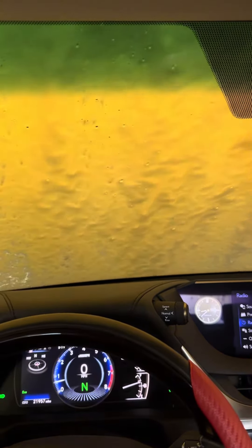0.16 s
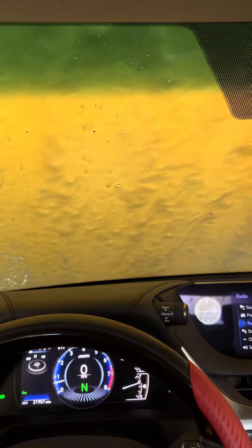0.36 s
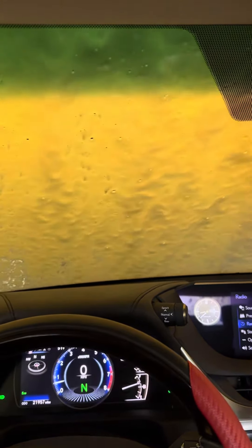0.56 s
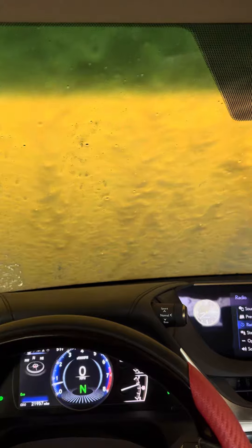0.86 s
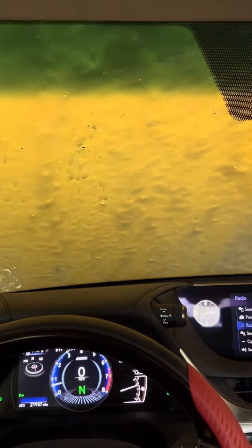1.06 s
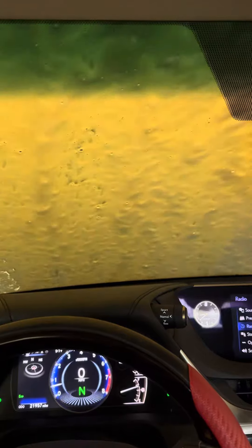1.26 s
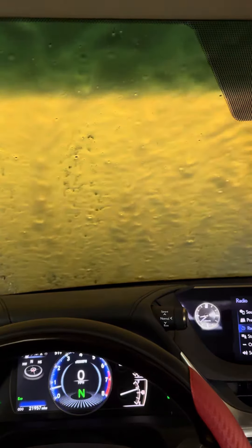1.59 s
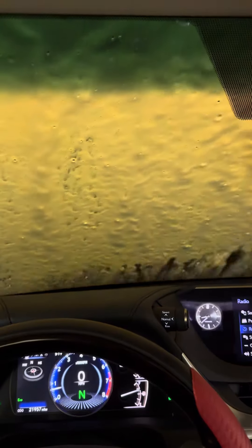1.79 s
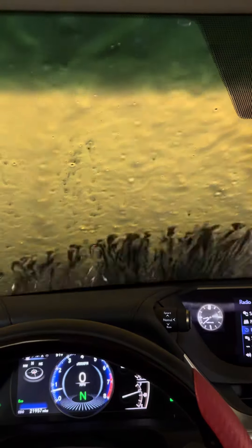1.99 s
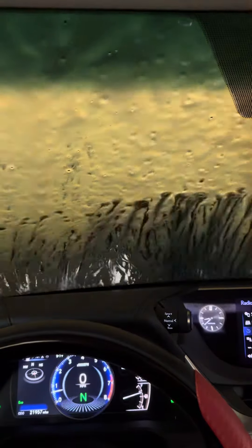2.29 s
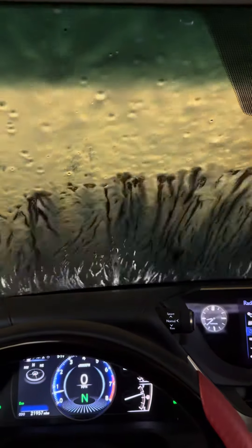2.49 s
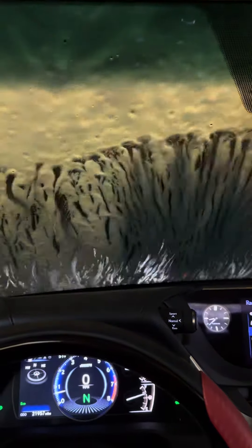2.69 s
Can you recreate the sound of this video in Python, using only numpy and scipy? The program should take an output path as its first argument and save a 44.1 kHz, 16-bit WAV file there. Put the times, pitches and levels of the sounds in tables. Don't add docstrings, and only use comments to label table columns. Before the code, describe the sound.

Inside a car cabin, a phone-like stereo microphone hears low, boomy car wash rumble; cloth thuds gather on the hood, surge into dense drumming after about 1.7 seconds, and wet strips swish and flick the windshield.

```python
import sys
import numpy as np
from scipy import signal
from scipy.fft import rfft, irfft, next_fast_len
from scipy.io import wavfile
from scipy.ndimage import uniform_filter1d

SR = 44100
rng = np.random.default_rng(int(sys.argv[2]) if len(sys.argv) > 2 else 0)


def materialize(psi):
    bounded = np.clip(np.atleast_2d(psi).T, -1, 1)
    quanta = np.round(bounded * 32767).astype(np.int16)
    wavfile.write(sys.argv[1], SR, quanta)


def amplitude_ratio(level_db):
    exponent = np.asarray(level_db, float) / 20
    return 10 ** exponent


N = 125685

# frequency_hz, density_db (per Hz)
WASH_SPECTRUM = [(25, -25.5), (55, -5), (95, -7), (160, -5), (450, -15), (1500, -31), (2500, -37),
                 (3100, -43),
                 (9000, -56.5), (15500, -66.5)]
# frequency_hz, density_db (per Hz)
NOZZLE_SPECTRUM = [(1200, -6), (2400, -1), (3000, -13), (4000, 4.5), (5000, -15), (6000, -2.5),
                   (8000, -18.5), (15800, -23.5)]
# time_s, level_db
HOOD_PRESSURE = [(0, -37), (.15, -33), (.3, -41.5), (1.1, -36), (1.17, -31), (1.4, -22), (1.69, -29.5),
                 (1.76, -15.5), (1.9, -13.5), (2.1, -15), (2.2, -16), (2.4, -14.5), (2.54, -22),
                 (2.85, -20)]
# pitch_hz, level_db, t60_s
BODY_MODES = [(55, -14, 0.19), (84, -9, 0.11), (102, -9, 0.24), (135, -2, 0.084), (167, -8, 0.3),
              (201.7, -6.5, 0.089), (277.7, -4, 0.035), (346, -6.5, 0.048), (460, -9.5, 0.043),
              (613, -15, 0.049)]
# start_s, level_db, pitch_hz
CLOTH_BLOWS = [(0.069, -17, 146.2), (0.138, -14, 161), (0.324, -23, 216.3), (0.406, -25.5, 128),
               (0.452, -17.5, 139.7), (0.491, -16, 149), (0.526, -17.5, 163.7), (0.64, -22, 139.3),
               (0.669, -20, 149.4), (0.749, -19, 168.7), (0.845, -15, 159.7), (0.904, -19.5, 125),
               (1.082, -25, 129.5), (1.143, -16, 122), (1.221, -15, 153), (1.288, -17.5, 145),
               (1.354, -11.5, 104.8), (1.423, -14, 117.7), (1.497, -18, 129.4), (1.621, -12.5, 165.5),
               (1.662, -18.5, 170.5), (1.746, -10, 121.4), (1.78, -14.5, 99), (1.814, -9, 153.8),
               (1.834, -8, 119.6), (1.884, -10, 220.7), (1.911, -11.5, 116.7), (1.978, -6.5, 146.5),
               (2.018, -3, 123.4), (2.059, -12, 109.4), (2.114, -4.5, 139.2), (2.164, -13, 139),
               (2.212, -13, 153.2), (2.255, -8, 155.8), (2.31, -3.5, 137.3), (2.334, -8.5, 151.7),
               (2.354, -8, 122.5), (2.4, -18.5, 155.3), (2.431, -7, 136.2), (2.47, -7.5, 153.4),
               (2.517, -14, 145.6), (2.578, -6, 136.3), (2.619, -10.5, 130.5), (2.688, -10, 141),
               (2.745, -8.5, 126.6), (2.801, -15.5, 135)]
# start_s, level_db, pitch_hz
STRIP_KNOCKS = [(0.022, -22, 301), (0.275, -17.5, 292), (0.333, -24.5, 324), (0.58, -26, 428),
                (0.69, -17, 261), (0.941, -18, 235), (0.994, -28, 250), (1.069, -21.5, 358),
                (1.158, -20, 302), (1.204, -22.5, 354), (1.248, -18.5, 256.5), (1.313, -24, 353),
                (1.389, -19.5, 245), (1.531, -16.5, 294), (1.591, -19, 334), (1.64, -30.5, 247),
                (1.72, -16, 247.5), (1.76, -16, 263), (1.836, -12.5, 260.5), (1.887, -16, 269),
                (2.006, -9.5, 317), (2.166, -14, 268), (2.241, -9.5, 315), (2.324, -21, 337),
                (2.425, -15.5, 343), (2.499, -15, 230), (2.589, -13, 359), (2.625, -17.5, 320),
                (2.657, -18.5, 398), (2.805, -17, 399)]
# start_s, level_db, pitch_hz
BODY_HEAVES = [
    (0.598, -26.5, 51.5),
    (1.23, -22.5, 76.7),
    (1.369, -27, 64.6),
    (1.45, -20, 55.9),
    (1.518, -23, 65.4),
    (1.628, -25.5, 58.7),
    (1.739, -25.5, 40.7),
    (1.879, -17, 78.1),
    (2.778, -21, 66.2),
]
# time_s, level_db
GLASS_CONTACT = [(0, -68.5), (1.2, -60.5), (1.7, -36), (1.9, -30), (2.3, -27), (2.5, -25), (2.7, -25.5),
                 (2.85, -23)]
# frequency_hz, density_db (per Hz)
WET_PANE_SPECTRUM = [(250, 1.5), (850, -2.5), (1500, -13.5), (2600, -21.5), (3100, -28.5), (6000, -32),
                     (9000, -41), (15500, -63)]
# start_s, peak_db
STRIP_TIPS = [(0.1424, -44), (0.412, -48.5), (0.6842, -43), (1.083, -48), (1.116, -49.5), (1.225, -43),
              (1.3178, -41), (1.5984, -37), (1.6404, -38.5), (1.6766, -39.5), (1.7295, -37.5),
              (1.8995, -34), (1.9423, -33.5), (1.984, -36), (2.0187, -33.5), (2.087, -43), (2.1215, -40),
              (2.326, -37), (2.4522, -30), (2.5406, -43.5), (2.5803, -33.5), (2.6526, -36.5),
              (2.768, -31.5), (2.811, -31.5)]
# frequency_hz, likeness (0-1)
PORT_LIKENESS = [(260, .9995), (700, .76), (1300, .94), (2850, .54), (3600, .93), (4600, .68), (5800, .89),
                 (9500, .86)]
# frequency_hz, lead_rad
RIGHT_LEAD = [(200, 0.), (700, -.45), (3300, -.15), (4900, -.25), (7000, 1.2), (10600, 3.1), (13500, 3.15),
              (15800, 4.1)]
# frequency_hz, balance_db
LEFT_OVER_RIGHT = [(180, 0.), (330, -1.3), (550, -1.), (800, .3), (16000, .1)]
# frequency_hz, gain_db
MIC_RESPONSE = [(15, -21.5), (30, 3), (50, 0), (16000, -0.5)]

SHARED_ONLY = np.array([[1], [0]])


def evened(x):
    return x / np.sqrt(np.mean(x ** 2) + 1e-20)


def read(points, hz):
    table_hz, value = np.transpose(points)
    return np.interp(np.log(hz + 1), np.log(table_hz + 1), value)


def follow(curve):
    time_s, level_db = np.transpose(curve)
    return amplitude_ratio(np.interp(np.arange(N) / SR, time_s, level_db))


def colour(x, points):
    size = next_fast_len(N + 8192)
    gain = amplitude_ratio(read(points, np.fft.rfftfreq(size, 1 / SR)))
    return irfft(rfft(x, size) * gain, size)[..., :N]


def impact_train(per_s, spread_db):
    hit, sign, size = rng.random((3, 2, N))
    strength = np.minimum(-np.log(size + 1e-9), 4)
    return (hit < per_s / SR) * np.sign(sign - .5) * amplitude_ratio(spread_db * strength)


def water_noise(points, swell_db, patch_db):
    frames, hz = N // 512 + 5, np.fft.rfftfreq(2048, 1 / SR)
    a, b, c, d, patches = rng.standard_normal((frames, 1025, 5)).T
    patches = uniform_filter1d(patches, size=16, axis=0)
    patches = evened(uniform_filter1d(patches, size=6, axis=1))
    swell = evened(uniform_filter1d(rng.standard_normal(frames), size=8))
    level_db = read(points, hz)[:, None] + patch_db * patches + swell_db * swell
    spectra = np.array([a + 1j * b, c + 1j * d]) * amplitude_ratio(level_db)
    return evened(signal.istft(spectra, nperseg=2048, noverlap=1536)[1][:, :N])


def strike(rows, gain_db, rise_s, t60_s):
    t, out = np.arange(SR // 3) / SR, np.zeros(N)
    swell = np.sin(np.pi / 2 * np.minimum(t / rise_s, 1)) ** 2
    decay_db = 60 * np.maximum(t - rise_s, 0) / t60_s
    for start_s, level_db, pitch_hz in rows:
        ring = amplitude_ratio(level_db + gain_db - decay_db) * swell * np.sin(2 * np.pi * pitch_hz * t)
        part = out[round(start_s * SR):][:len(t)]
        part += ring[:len(part)]
    return out * SHARED_ONLY


def wash():
    roar = water_noise(WASH_SPECTRUM, swell_db=.2, patch_db=1.0)
    hiss = water_noise(NOZZLE_SPECTRUM, swell_db=.5, patch_db=.6)
    return amplitude_ratio(-26.5) * roar + amplitude_ratio(-59.5) * hiss


def hood_drumming():
    t = np.arange(SR // 3) / SR
    ring = np.zeros(len(t))
    for k, (pitch_hz, level_db, t60_s) in enumerate(BODY_MODES):
        ring += (-1) ** k * amplitude_ratio(level_db - 60 * t / t60_s) * np.sin(2 * np.pi * pitch_hz * t)
    strips = impact_train(per_s=360, spread_db=2)
    drum = evened(signal.fftconvolve(strips, ring[None], axes=1)[:, :N])
    return amplitude_ratio(-2.5) * follow(HOOD_PRESSURE) * drum


def hood_blows():
    heaves = strike(BODY_HEAVES, gain_db=-2, rise_s=.026, t60_s=.42)
    blows = strike(CLOTH_BLOWS, gain_db=-3, rise_s=.011, t60_s=.17)
    knocks = strike(STRIP_KNOCKS, gain_db=-4, rise_s=.0038, t60_s=.12)
    return heaves + blows + knocks


def glass_slaps():
    t = np.arange(2000) / SR
    swish = rng.standard_normal((2, N))
    splat = rng.standard_normal((2, 2000)) * np.exp(-t / .0042)
    hits = impact_train(per_s=1400, spread_db=4.5)
    slaps = evened(signal.fftconvolve(hits, splat, axes=1)[:, :N])
    swish_share = .59
    cloth = swish_share * swish + (1 - swish_share) * slaps
    return follow(GLASS_CONTACT) * evened(colour(cloth, WET_PANE_SPECTRUM))


def glass_tips():
    t, tips = np.arange(2000) / SR, np.zeros(N)
    for start_s, peak_db in STRIP_TIPS:
        burst = amplitude_ratio(peak_db + 11) * rng.standard_normal(2000) * np.exp(-t / .0044)
        part = tips[round(start_s * SR):][:len(t)]
        part += burst[:len(part)]
    return colour(tips, WET_PANE_SPECTRUM) * amplitude_ratio(14) * SHARED_ONLY


def scene():
    return wash() + hood_drumming() + hood_blows() + glass_slaps() + glass_tips()


def band_limit(x):
    return signal.sosfilt(signal.butter(12, 15750, fs=SR, output="sos"), x)


def record(dry):
    size = next_fast_len(N + 8192)
    hz = np.fft.rfftfreq(size, 1 / SR)
    shared, unrelated = rfft(dry, size)
    angle = np.arccos(np.clip(read(PORT_LIKENESS, hz), 0, 1)) / 2
    common, difference = np.cos(angle) * shared, np.sin(angle) * unrelated
    offset = np.exp(1j * read(RIGHT_LEAD, hz) / 2) / amplitude_ratio(read(LEFT_OVER_RIGHT, hz) / 2)
    ports = np.array([(common + difference) / offset, (common - difference) * offset])
    response = amplitude_ratio(read(MIC_RESPONSE, hz)) * (hz < 15800)
    mix = irfft(ports * response, size)[:, :N]
    return band_limit(mix)


dry = scene()
out = record(dry)
materialize(out)
```